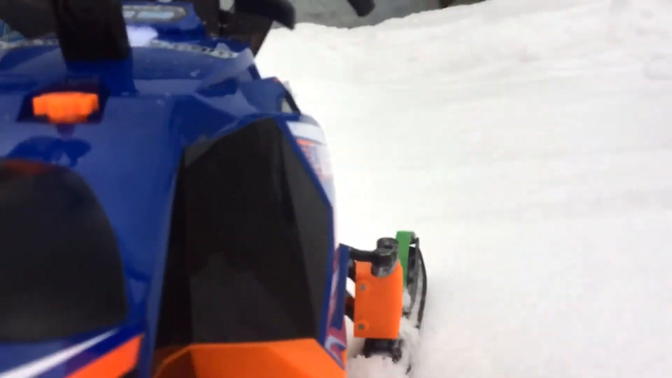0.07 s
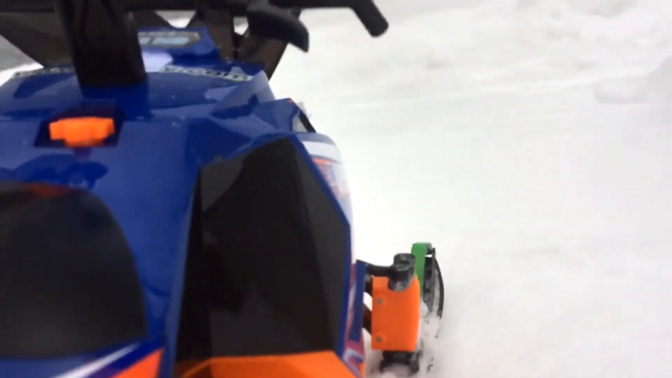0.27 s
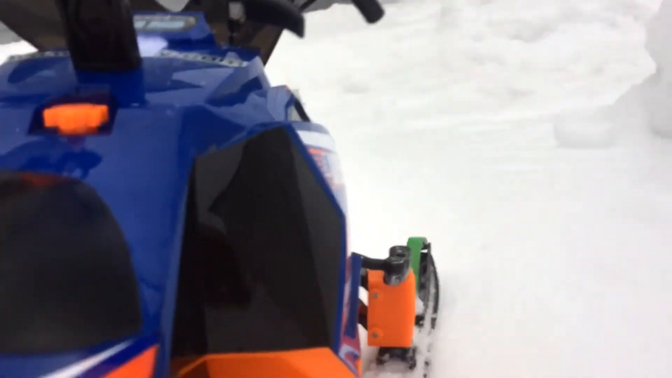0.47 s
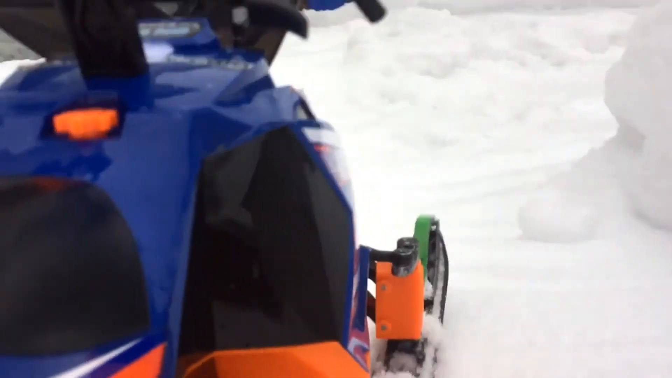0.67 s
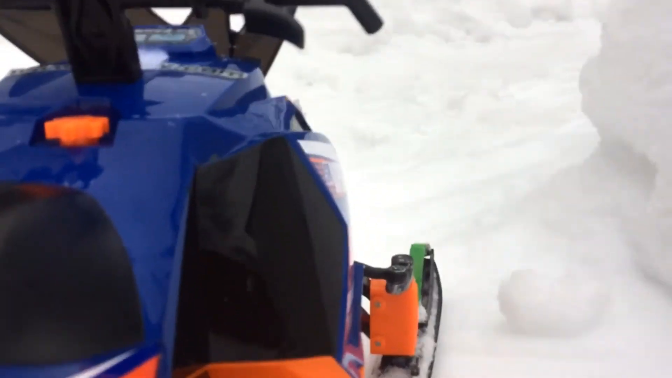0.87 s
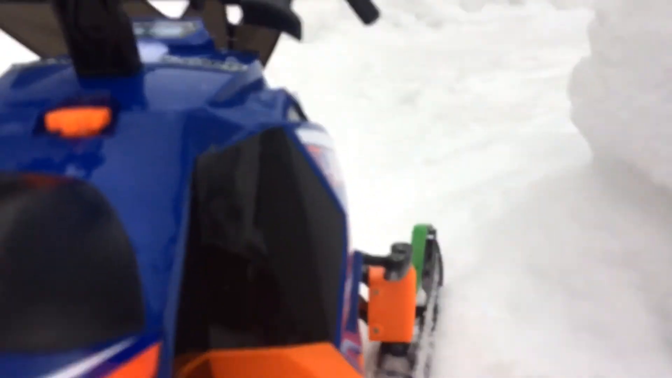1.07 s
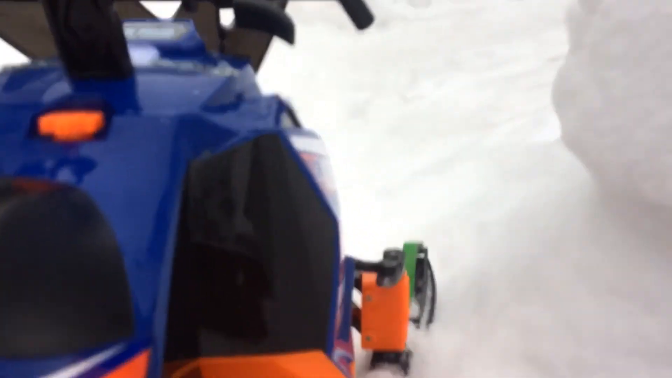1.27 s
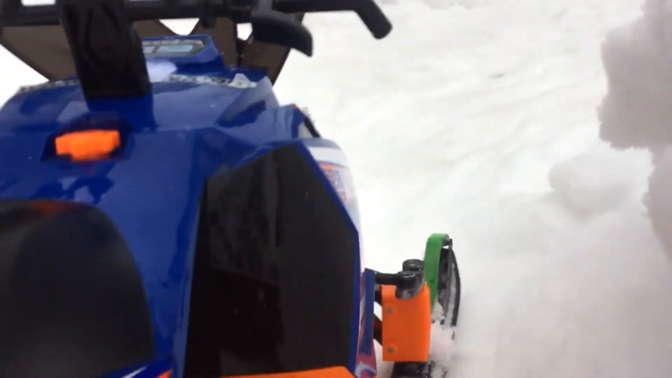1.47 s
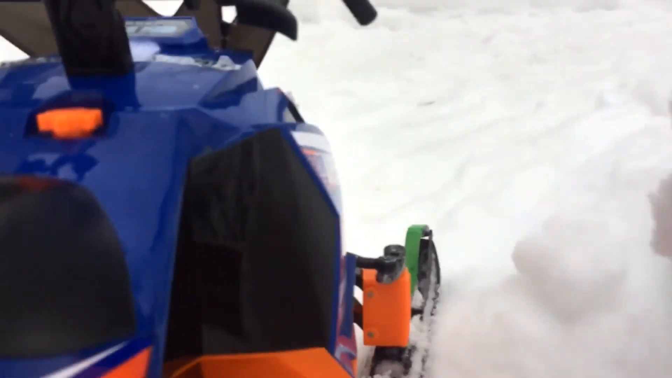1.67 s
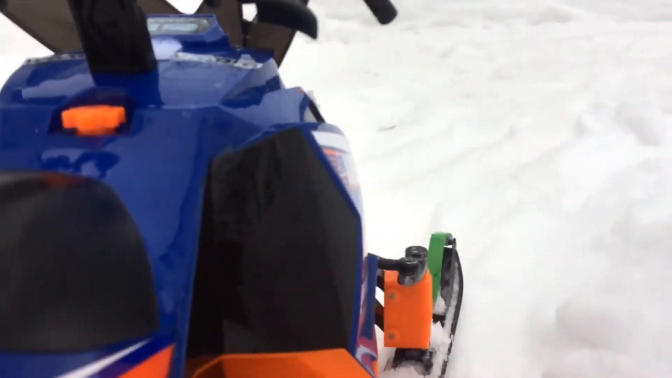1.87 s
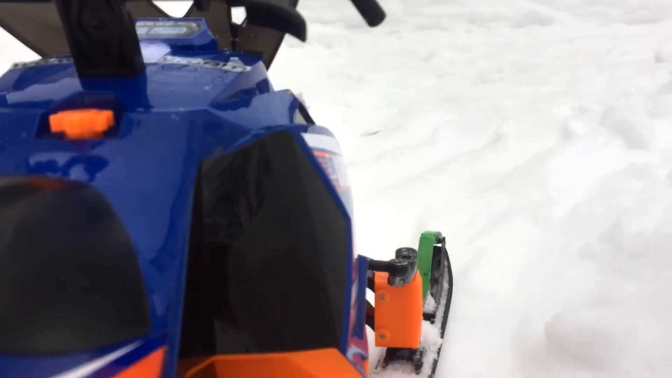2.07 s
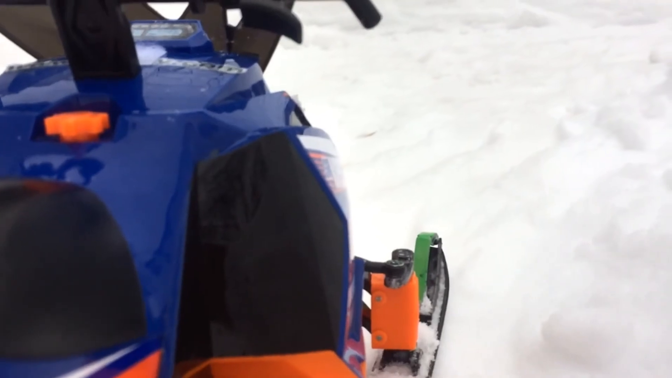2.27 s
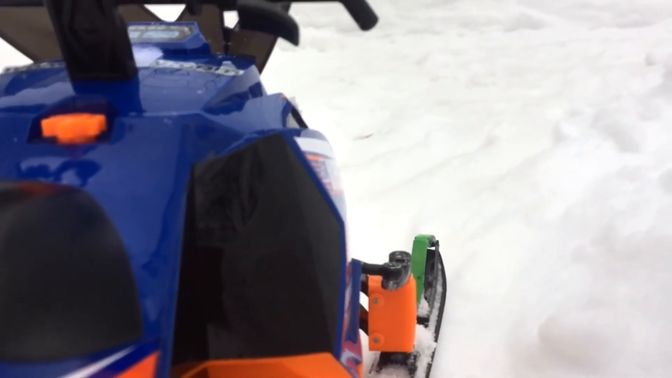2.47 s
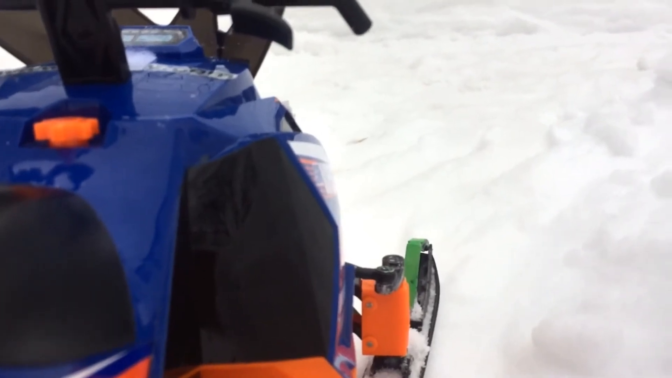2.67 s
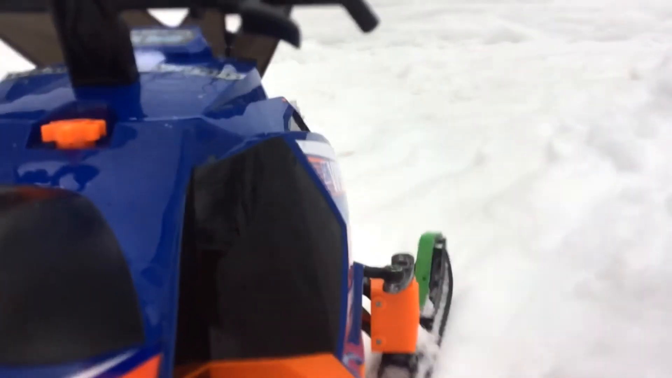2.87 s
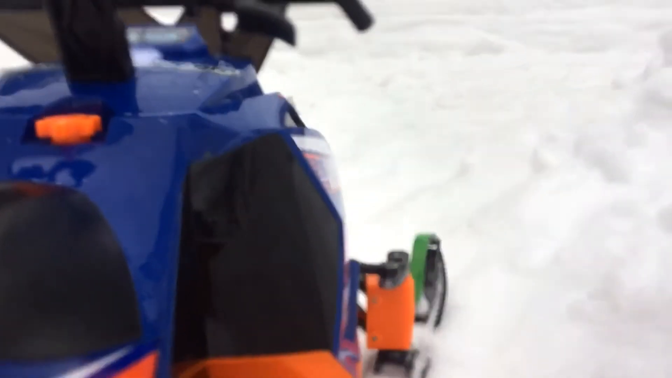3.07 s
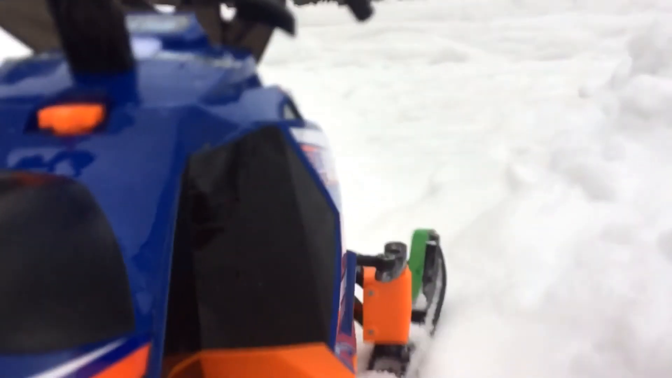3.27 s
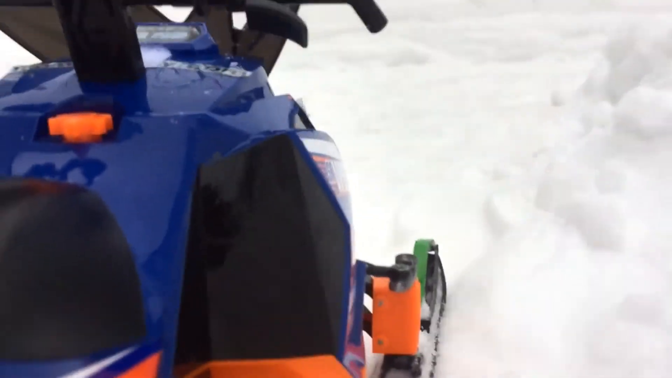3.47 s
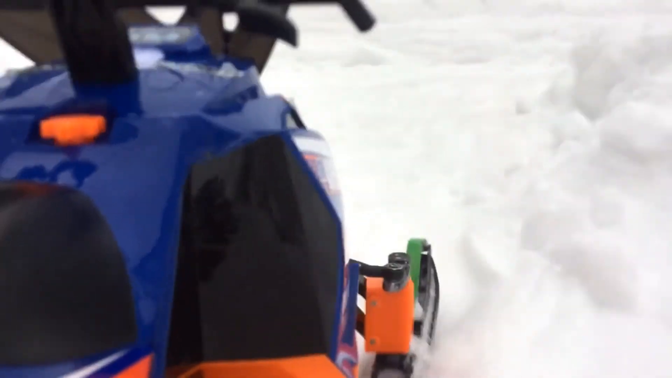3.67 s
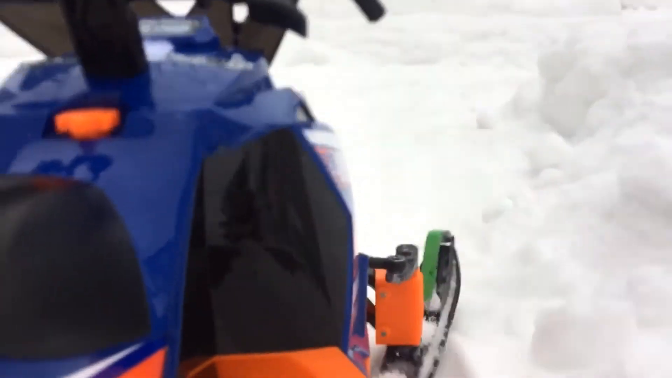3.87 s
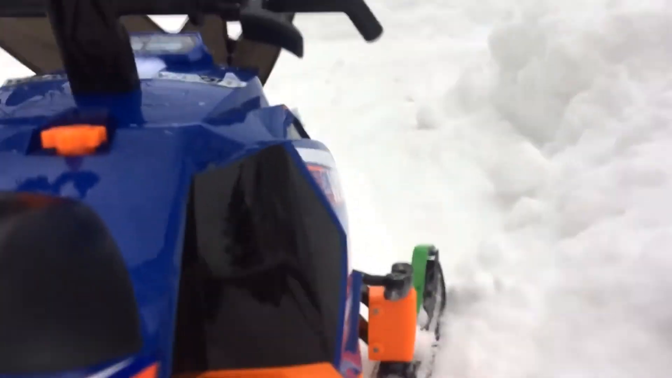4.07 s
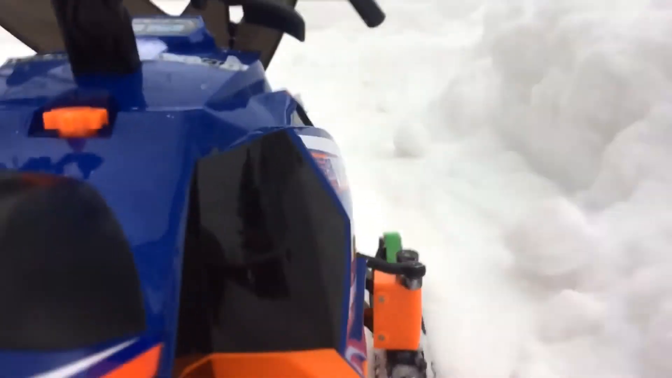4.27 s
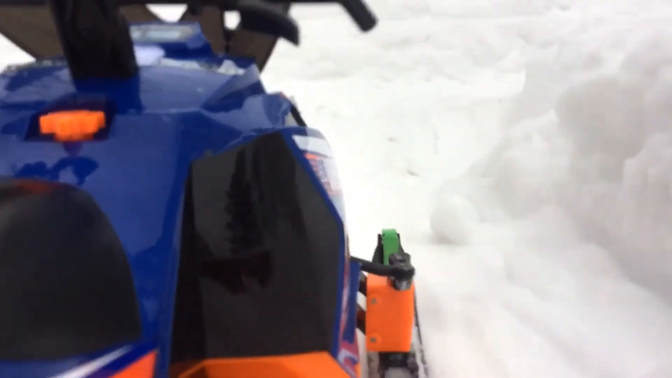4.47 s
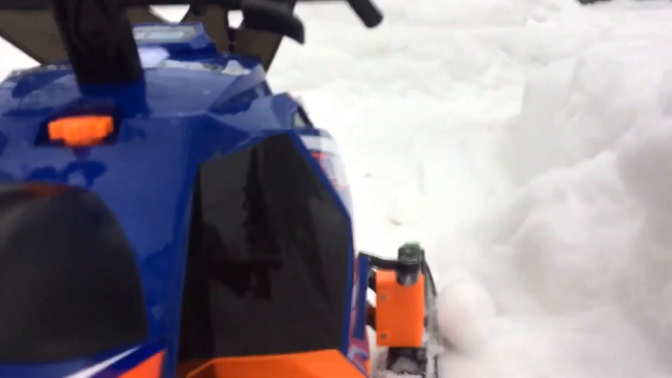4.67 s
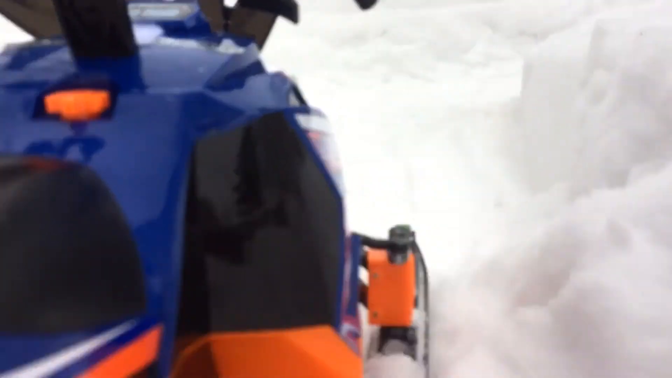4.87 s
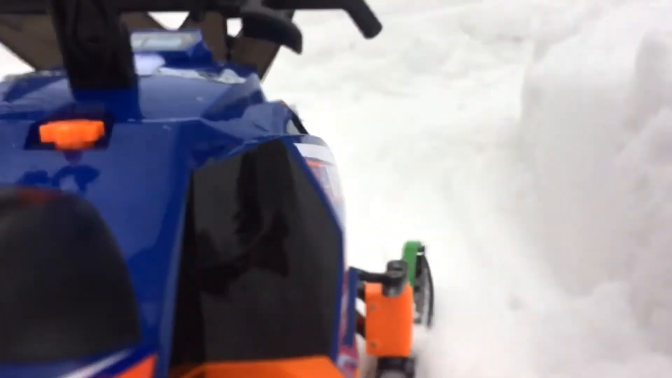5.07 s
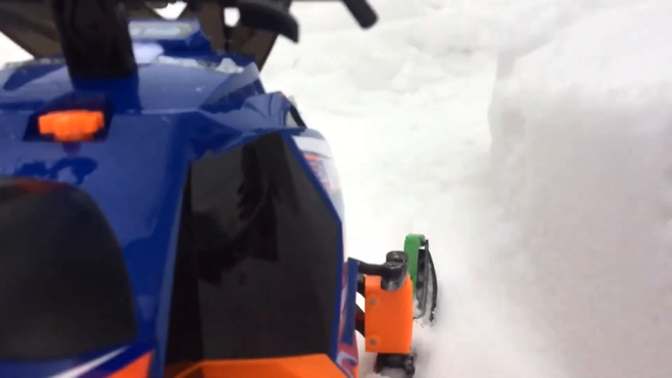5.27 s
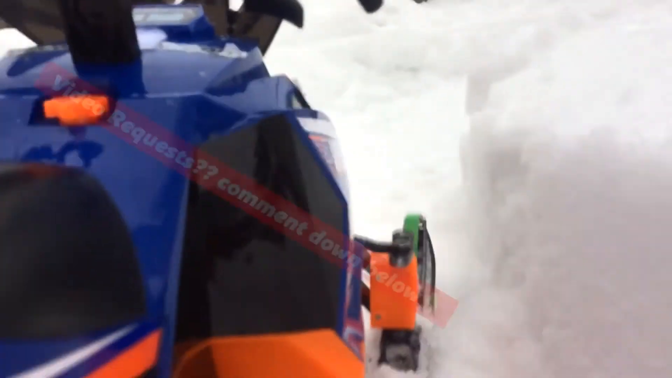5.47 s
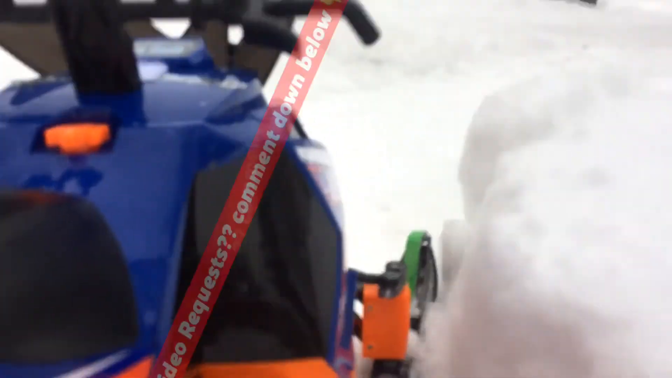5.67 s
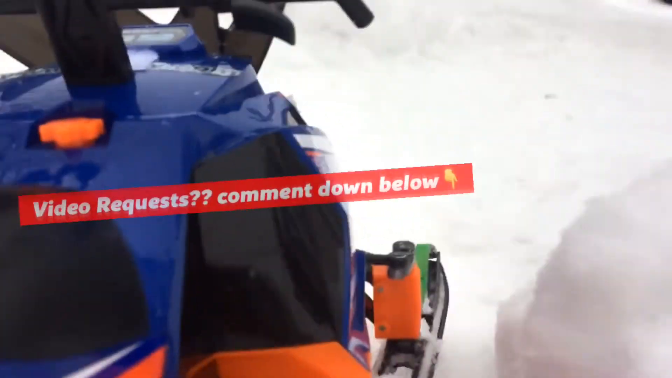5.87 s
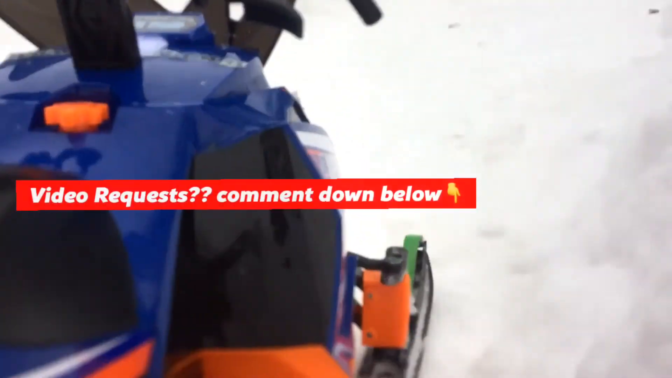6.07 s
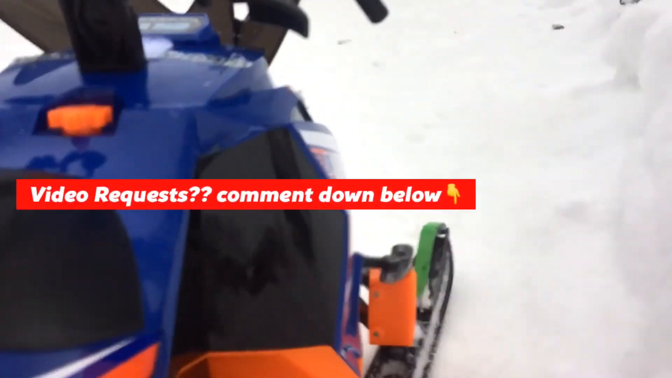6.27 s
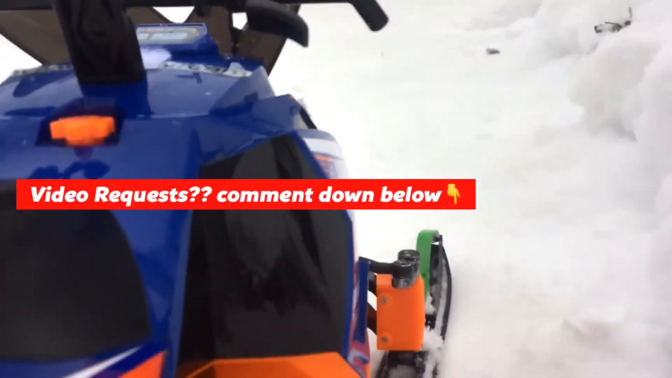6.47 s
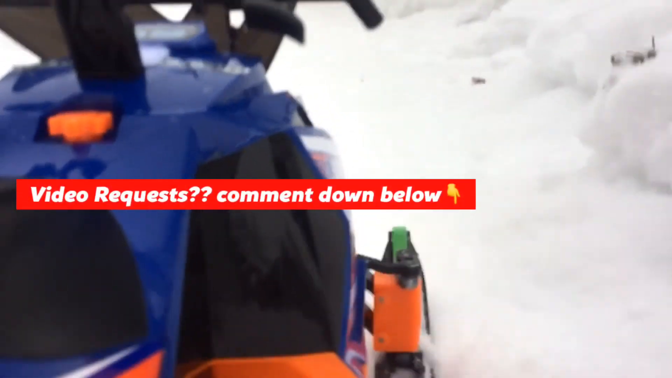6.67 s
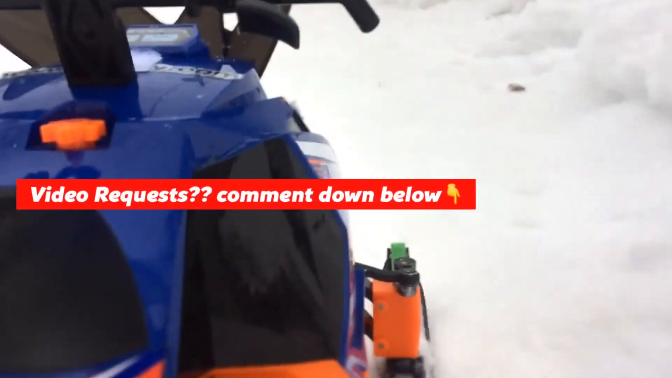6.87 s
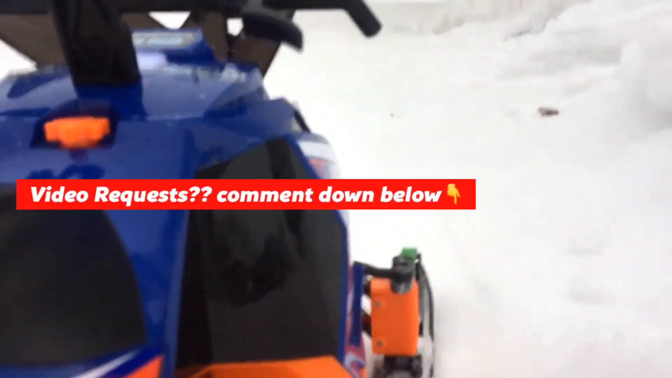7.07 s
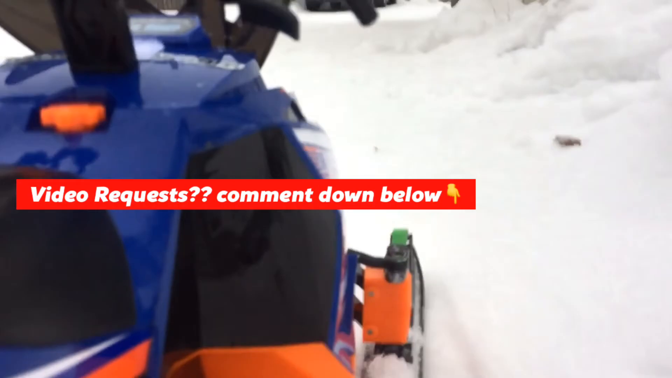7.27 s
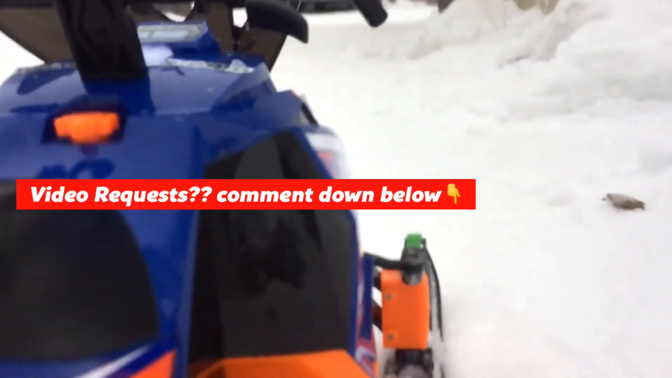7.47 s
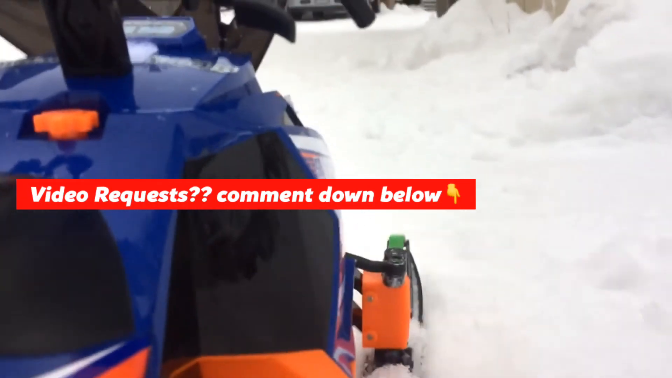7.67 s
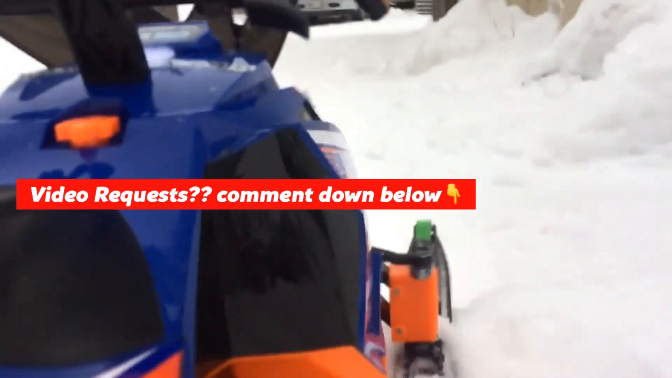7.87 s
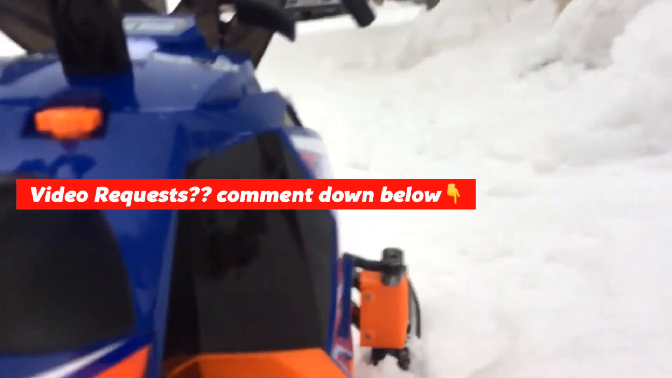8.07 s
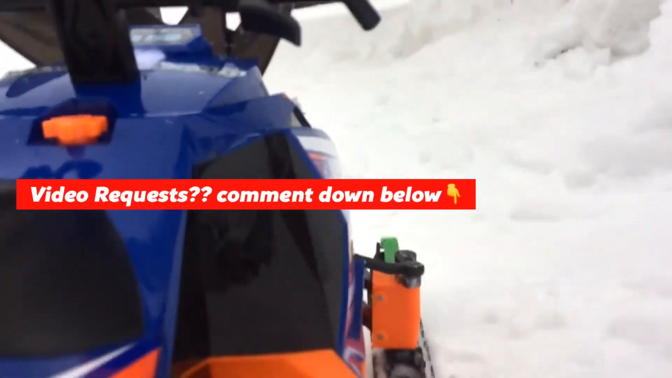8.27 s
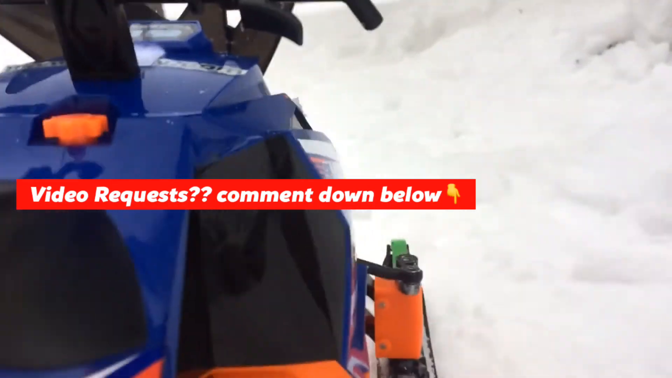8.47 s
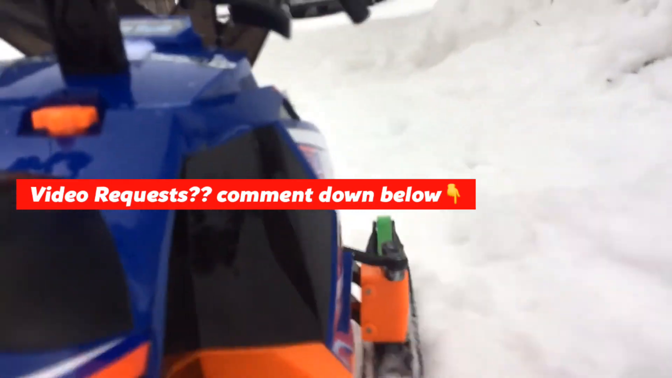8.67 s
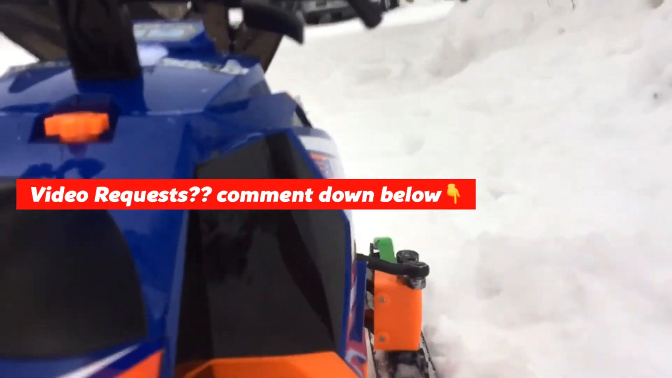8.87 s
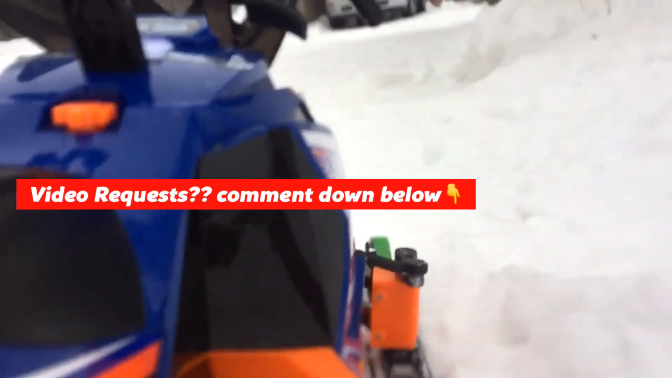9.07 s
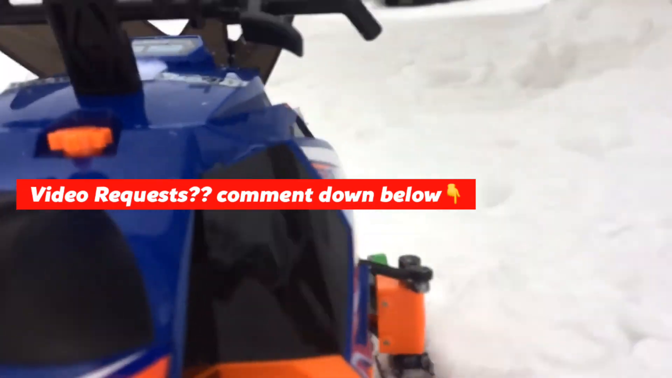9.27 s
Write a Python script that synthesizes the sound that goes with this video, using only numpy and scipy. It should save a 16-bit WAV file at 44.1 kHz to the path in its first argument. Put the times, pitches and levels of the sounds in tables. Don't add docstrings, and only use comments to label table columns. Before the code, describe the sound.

A small geared electric motor whirrs and rattles in short throttle bursts as a tracked toy vehicle churns over snow, nearly stopping once before lurching on.

```python
import sys
import numpy as np
from scipy import signal
from scipy.fft import rfft, irfft, next_fast_len
from scipy.io import wavfile
from scipy.ndimage import map_coordinates

SR = 44100
rng = np.random.default_rng(int(sys.argv[2]) if len(sys.argv) > 2 else 0)


def attenuation_scalar(level_db):
    decades = np.asarray(level_db, float) / 20
    return 10 ** decades


def transcribe(u):
    v = np.clip(np.atleast_2d(u).T, -1, 1)
    q = np.round(v * 32767).astype(np.int16)
    wavfile.write(sys.argv[1], SR, q)


N = 410571

# (time [s], lug rate [Hz], mount hum [dB])
LUGS_AND_HUM = [(0.0, 66.6, -36), (0.26, 60.66, -38), (1.3, 59.6, -29), (1.5, 54.8, -51.5),
                (1.81, 61.2, -26), (2.57, 70.04, -60.5), (2.75, 60.65, -29), (3.89, 58.2, -33.5),
                (4.07, 66.63, -50.5), (4.17, 60.6, -30.5), (4.67, 55.9, -37), (5.37, 62.5, -29.5),
                (5.73, 56.9, -34.5), (6.33, 55.57, -27), (6.71, 58.2, -38), (7.23, 60.5, -34),
                (9.08, 60.05, -35), (9.31, 55.7, -41)]
# (clutch bite [s], length [s], first motor effort [dB], last effort [dB], ground roughness [dB])
THROTTLE_BURSTS = [(-.1, .31, -26, -25, -3.5), (0.371, 0.25, -24.5, -27.5, -4.5),
                   (0.857, 0.16, -23, -26.5, 1), (1.176, 0.15, -24, -25, 0.5),
                   (1.51, .115, -26.5, -26, -1.5), (2.653, 0.12, -19, -29.5, 3),
                   (2.969, 0.32, -27.5, -27.5, 2), (3.463, 0.54, -27, -31, 1.5),
                   (4.096, .11, -28.5, -30, -1), (4.347, 0.16, -27, -27.5, -2),
                   (4.564, 0.093, -26.5, -25, -0.5), (4.772, 0.28, -26.5, -25.5, 0),
                   (5.231, 0.28, -24, -28.5, 2), (5.545, .27, -30, -29.5, -2),
                   (5.97, 0.14, -28.5, -25, -3.5), (6.182, 0.29, -41, -39, -1),
                   (6.529, .22, -22.5, -26.5, 1.5), (6.923, 0.51, -27.5, -27.5, 0.5),
                   (7.628, 0.17, -27.5, -24.5, 2), (7.949, 0.15, -26, -26, 3), (8.228, .12, -26.5, -32, -2),
                   (8.471, 0.13, -28, -24.5, 2), (8.835, 0.35, -22.5, -34, 2)]
# (centre [Hz], width [Hz], level [dB])
PANEL_MODES = [(232.4, 40.2, -4), (301.5, 88, -7), (478.7, 45.6, 2.5), (633.5, 147, -2)]
# (centre [Hz], width [Hz], level [dB])
GEARBOX_MODES = [(1152, 191, 4.5), (1432, 168.6, 9), (2900, 257, -6), (3442, 307, -4), (4424, 290, -15.5),
                 (6090, 830, -19), (6850, 486, -16.5), (9200, 180, -32.5), (11300, 400, -40.5)]
BURIED_DB = -5.5


def unit(x):
    return x / np.sqrt(np.mean(x ** 2) + 1e-20)


def along(points, hz):
    f, v = np.transpose(points)
    return np.interp(np.log(hz + 1), np.log(f + 1), v)


def curves(rows):
    s, *cols = np.transpose(rows)
    return [np.interp(np.arange(N) / SR, s, c) for c in cols]


def wobble(rate_hz):
    knots = np.clip(rng.standard_normal(int(N * rate_hz / SR) + 4), -2.5, 1.7)
    return map_coordinates(knots, [np.arange(N) * rate_hz / SR])


def filtered(x, response):
    m = next_fast_len(N + SR // 2)
    return irfft(rfft(x, m) * response(np.fft.rfftfreq(m, 1 / SR)), m)[..., :N]


def resonance(f, centre_hz, width_hz):
    damping = 1j * f * width_hz
    return damping / (centre_hz ** 2 - f * f + damping)


def ringing(x, modes):
    # (frequency [Hz], level [dB])
    port = [(20, -16.5), (120, 22), (2100, -16), (2500, -4.5), (3700, -8), (7200, -12.5), (8000, -17.5),
            (11000, -17.5), (16000, -19.5)]

    def response(f):
        body = sum((-1) ** k * attenuation_scalar(db) * resonance(f, centre_hz, width_hz)
                   for k, (centre_hz, width_hz, db) in enumerate(modes))
        return body * attenuation_scalar(along(port, f))

    return filtered(x, response)


def bursts(times_s, levels_db, t60_s):
    starts = np.zeros(N)
    np.add.at(starts, np.clip(np.round(times_s * SR).astype(int), 0, N - 1), attenuation_scalar(levels_db))
    t = np.arange(SR // 20) / SR
    return signal.fftconvolve(starts, attenuation_scalar(-60 * t / t60_s))[:N] * rng.standard_normal(N)


def lug_turns():
    return np.cumsum(curves(LUGS_AND_HUM)[0]) / SR


def throttle():
    # (time [s], level [dB])
    coasting = [(0, -41.5), (.3, -36.5), (.75, -40.5), (1.12, -44), (1.45, -40.5), (1.86, -45.5),
                (1.99, -62), (2.2, -89), (2.51, -67.5), (2.92, -64.5), (3.4, -46), (4.07, -49), (4.4, -39),
                (5.19, -49.5), (6.3, -42.5), (6.9, -42), (7.9, -45), (9.31, -53.5)]
    bite_s, rise_db_per_s, fall_db_per_s = -0.00069, 1500, 262.5
    slack_db_per_s = 699.5
    lurch_db, lurch_peak_s, gentle_db = 2, 0.069, 5
    cavity_over_db, chassis_over_db, chassis_grows = 10.5, 2.5, 1.41

    t = np.arange(N) / SR
    coast_db, = curves(coasting)
    power = attenuation_scalar(2 * (coast_db + np.array([[0], [17.5], [7]])))
    for start, length, first_db, last_db, rough_db in THROTTLE_BURSTS:
        near = slice(max(0, int((start - .1) * SR)), int((start + length + .4) * SR))
        u = t[near] - start
        effort_db = np.interp(u, [0, length], [first_db, last_db])
        effort_db = effort_db - rise_db_per_s * np.maximum(bite_s - u, 0)
        effort_db = effort_db - fall_db_per_s * np.maximum(u - length, 0)
        suddenness = np.clip(2.5 + (first_db - last_db) / gentle_db, 0, 1)
        lurch = np.maximum(u, 0) / lurch_peak_s * np.exp(1 - u / lurch_peak_s)
        shake_db = rough_db + lurch_db * suddenness * lurch - slack_db_per_s * np.maximum(-u, 0)
        power[:, near] += attenuation_scalar(2 * np.array([effort_db, effort_db + cavity_over_db + shake_db,
                                            effort_db + chassis_over_db + chassis_grows * shake_db]))
    return 10 * np.log10(power)


def shaking(lug_db, lumpy_db):
    times_s = np.flatnonzero(np.diff(np.floor(lug_turns()))) / SR
    chance = np.clip(rng.standard_normal((len(times_s), 2)), -2, 1.4)
    slaps = bursts(times_s + .003 * chance[:, 0], 2.5 * chance[:, 1], t60_s=.035)
    teeth = attenuation_scalar(lumpy_db * wobble(140)) * rng.standard_normal(N)
    return unit(teeth) + attenuation_scalar(lug_db) * unit(slaps)


def drivetrain(gear_db, cavity_db, chassis_db, clear_db):
    # (centre [Hz], width [Hz], level [dB])
    cavity_modes = [(1844, 102.2, 3), (2067, 200.4, -5.5)]
    force = shaking(lug_db=-6.0, lumpy_db=3) * attenuation_scalar(1.68 * wobble(25))
    noise = rng.standard_normal(N)
    smooth = .6 * (1 - clear_db / BURIED_DB)
    force = np.sqrt(1 - smooth) * force + np.sqrt(smooth) * noise

    evenness = attenuation_scalar(-.55 * (clear_db + 9))
    shells = [(GEARBOX_MODES, attenuation_scalar(gear_db + 8.5) * evenness),
              (cavity_modes, attenuation_scalar(cavity_db + 2.2 * wobble(14))),
              (PANEL_MODES, attenuation_scalar(chassis_db + 1.5 * wobble(7.2) + 2.65 * wobble(30)))]
    return sum(ringing(force * gain, modes) / np.std(ringing(noise, modes)) for modes, gain in shells)


def meshing():
    # (time [s], tooth-mesh rate [Hz])
    songs = [
        [(0, 744), (.04, 707), (.128, 703), (.164, 709), (.21, 745)],
        [(.39, 705), (.415, 737), (.46, 655), (.507, 740), (.545, 670), (.583, 643), (.61, 680)],
        [(1.33, 605), (1.36, 545), (1.39, 530)],
        [(1.555, 660), (1.577, 722), (1.6, 670)],
        [(3.9, 760), (3.925, 800)],
        [(4.36, 650), (4.39, 678), (4.42, 620), (4.475, 745)],
        [(4.565, 580), (4.593, 705)],
        [(4.78, 560), (4.81, 715)],
        [(5.63, 660), (5.645, 668), (5.68, 788), (5.7, 780)],
        [(5.765, 578), (5.805, 730), (5.83, 740)],
        [(6.005, 700), (6.03, 778), (6.05, 760)],
        [(6.96, 640), (7.0, 560)],
        [(7.41, 700), (7.44, 715)],
        [(8.245, 590), (8.295, 560), (8.325, 610)],
    ]
    clears_s = .035
    t = np.arange(N) / SR
    away_s = np.min([np.maximum(song[0][0] - t, t - song[-1][0]) for song in songs], axis=0)
    return curves(sum(songs, []))[0], BURIED_DB * np.clip(away_s / clears_s, 0, 1)


def orders(hz, table):
    turns = np.cumsum(hz) / SR
    return sum(attenuation_scalar(db + 2 * wobble(40)) * np.sin(2 * np.pi * (k * turns + rng.random())) for k, db in table)


def whine(gear_db, mesh_hz, clear_db):
    # (multiple of mesh rate, level [dB])
    mesh_orders = [(1, -8), (2, 0), (3, 1), (4, 2.5), (5, 2), (6, -2), (7, -9)]
    # (multiple of sprocket rate, level [dB])
    sprocket_orders = [(2, -15), (3, -7), (4, 2), (5, -7)]
    # (frequency [Hz], level [dB])
    whine_path = [(500, -20.5), (1100, 4), (1500, 4.5), (2200, 3.5), (2750, -12.5), (3500, 2), (3900, -20),
                  (4600, -11), (8000, -37.5)]
    sprocket_hz = 386.8
    hunting = clear_db / BURIED_DB
    mesh = orders(mesh_hz * np.exp(.11 * hunting * wobble(17) + .003 * wobble(90)), mesh_orders)
    sprocket = orders(sprocket_hz * np.exp(0.018 * hunting * wobble(17) + 0.0055 * wobble(30)),
                      sprocket_orders)
    song = attenuation_scalar(clear_db + gear_db) * (attenuation_scalar(.5) * mesh + attenuation_scalar(-2) * sprocket)
    return filtered(song, lambda f: attenuation_scalar(along(whine_path, f)))


def jolts():
    # (time [s], peak [dB])
    hard_jolts = [(0.218, -4), (0.2807, -7), (0.3254, -4.5), (.5748, 3.5), (0.651, 2.5), (0.8926, 3),
                  (0.9963, 1.5), (1.2153, 8), (1.9727, -22.5), (2.6678, 5), (2.7655, -2.5), (3.0183, 2.5),
                  (3.1682, 0.5), (3.291, -1), (3.3167, -0.5), (3.5051, 5), (3.8729, 0.5), (4.1273, -4),
                  (4.633, -1), (4.986, -1.5), (5.0737, -3), (5.2936, 9), (5.3744, 3.5), (6.33, -4.5),
                  (6.4393, -1), (6.573, 3), (6.7978, -0.5), (7.0307, 4), (7.7708, -1.5), (8.8721, 2.5)]
    bite_db = 17.5
    bites = [(start, first_db + rough_db + bite_db)
             for start, _, first_db, _, rough_db in THROTTLE_BURSTS[1:]]
    times_s, levels_db = np.transpose(hard_jolts + bites)
    notes, t = np.zeros(N + SR), np.arange(SR // 20) / SR
    chance = rng.standard_normal((len(times_s), 2))
    for start, level_db, (detune, spread) in zip(times_s, levels_db, chance):
        t60_s = 0.05 * np.exp(0.41 * spread)
        swell = (1 - np.exp(-t / 0.0021)) * attenuation_scalar(-60 * t / t60_s)
        note = np.sin(2 * np.pi * 1870 * (1 + 0.036 * detune) * t)
        notes[round(start * SR):][:len(t)] += attenuation_scalar(level_db + 0.5) * swell * note
    chatter = bursts(times_s, levels_db, t60_s=0.02)
    return notes[:N] + attenuation_scalar(-1.5) * ringing(chatter, GEARBOX_MODES) + attenuation_scalar(5.5) * ringing(chatter, PANEL_MODES)


def mount(chassis_db):
    swing = np.sqrt(2) * np.sin(2 * np.pi * lug_turns() + 1.1 * wobble(18))
    rumble_db = [(20, -29.5), (40, -6.0), (90, 9.5), (150, -12.0), (300, -56.0)]  # (Hz, dB)
    rumble = filtered(rng.standard_normal(N), lambda f: attenuation_scalar(along(rumble_db, f)))
    follow_db = 0.61 * (np.maximum(chassis_db, -45) + 27)
    hum_db = curves(LUGS_AND_HUM)[1] + follow_db + 3.9 * wobble(18)
    return attenuation_scalar(hum_db) * (swing + attenuation_scalar(-6) * unit(rumble))


def ticks(chassis_db):
    # (first touch [s], touches, gap [s], last peak [dB])
    tick_runs = [(0.59, 1, 0, -17), (0.936, 1, 0, -20.5), (0.9976, 1, 0, -24.5), (1.222, 1, 0, -29.5),
                 (1.2897, 2, 0.036, -19), (2.676, 2, .0153, -14), (2.744, 5, .0168, -13),
                 (2.9977, 1, 0, -28.5), (3.0431, 1, 0, -26), (3.0899, 3, .0176, -15.5),
                 (3.176, 2, .0172, -18), (3.4932, 3, 0.023, -16.5), (3.5786, 3, .0167, -18),
                 (3.8402, 1, 0, -32), (5.2752, 2, .023, -14), (5.3325, 2, .0318, -24), (5.4148, 1, 0, -20),
                 (5.677, 1, 0, -29), (5.999, 1, 0, -22.5), (6.1314, 1, 0, -19.5), (6.225, 2, 0.046, -24),
                 (6.568, 1, 0, -30.5), (6.727, 2, .0335, -18.5), (7.1943, 1, 0, -23.5), (7.746, 1, 0, -21),
                 (8.0637, 1, 0, -23), (8.8794, 2, .018, -28.5), (8.95, 2, .019, -22),
                 (9.0008, 3, .0314, -23.5), (7.664, 1, 0, -26)]
    # (centre [Hz], width [Hz], level [dB])
    wall_modes = [(5460, 1400, 0.5), (14700, 2400, -2)]
    grows_db = 2
    stray_share, stray_db, stray_grows = .35, -37.5, 1.8

    touches = [(first + k * gap, last_db - grows_db * (count - 1 - k))
               for first, count, gap, last_db in tick_runs for k in range(count)]
    times_s, levels_db = np.transpose(touches)
    swings = np.flatnonzero(np.diff(np.floor(lug_turns())))
    chance = rng.random((len(swings), 2))
    touching = chance[:, 0] < stray_share
    stray = swings[touching]
    drumming_db = stray_grows * (np.minimum(chassis_db[stray], -15) + 20.5)
    times_s = np.append(times_s, stray / SR)
    levels_db = np.append(levels_db, drumming_db + stray_db - 12 * chance[touching, 1])

    def click(gain_db, t60_s, centre_hz, width_hz, mode_db):
        puffs = bursts(times_s, levels_db + gain_db, t60_s)
        return filtered(puffs, lambda f: attenuation_scalar(mode_db) * resonance(f, centre_hz, width_hz) ** 2)

    bright = click(13.5, 0.0012, *wall_modes[1])
    wide = click(7.0, 0.00026, 9500, 12000, -8)
    middle = click(20.5, 0.001, *wall_modes[0])
    return bright + wide + middle


def air():
    # (frequency [Hz], level [dB])
    hush_spectrum = [(15, -46), (25, -15.5), (48, 6), (70, 6.5), (108, 5), (175, -7.5), (451, -28.5),
                     (1480, -41), (1840, -13.5), (2550, -41), (3160, -32.5), (4740, -44.5), (16000, -58.5)]
    # (time [s], level [dB])
    breeze = [(0, -42), (2.12, -55), (2.3, -45.5), (2.55, -44), (2.9, -46.5), (9.31, -42.5)]
    hush = filtered(rng.standard_normal(N), lambda f: attenuation_scalar(along(hush_spectrum, f)))
    return attenuation_scalar(curves(breeze)[0] + 1.4 * wobble(4.9)) * unit(hush)


def scene():
    gear_db, cavity_db, chassis_db = throttle()
    mesh_hz, clear_db = meshing()
    vehicle = drivetrain(gear_db, cavity_db, chassis_db, clear_db) + whine(gear_db, mesh_hz, clear_db) + jolts()
    return (vehicle + mount(chassis_db) + ticks(chassis_db) + air())[None]


def low_pass(x):
    return signal.sosfilt(signal.butter(12, 16890, fs=SR, output="sos"), x)


def record(dry):
    hiss_db, gain_db, top_hz = -80, -1, 15900
    driven = attenuation_scalar(gain_db) * (dry + attenuation_scalar(hiss_db) * rng.standard_normal(dry.shape))
    clipped = driven / (1 + np.abs(driven) ** 10) ** (1 / 10)
    mix = filtered(clipped, lambda f: np.where(f < top_hz, 1, attenuation_scalar(-25)))
    return low_pass(mix)


dry = scene()
out = record(dry)
transcribe(out)
```